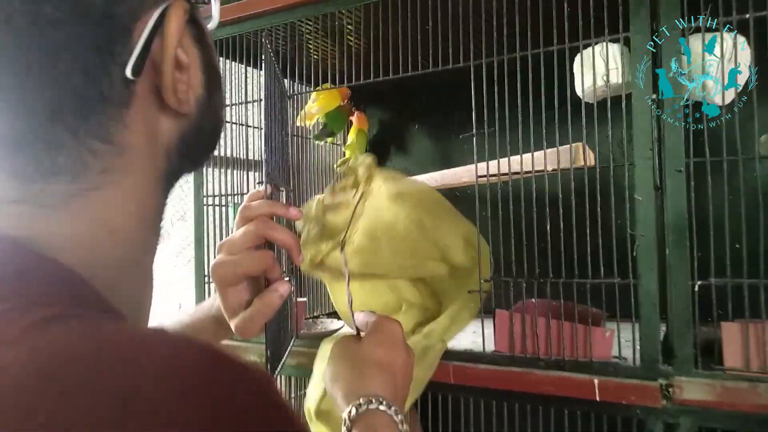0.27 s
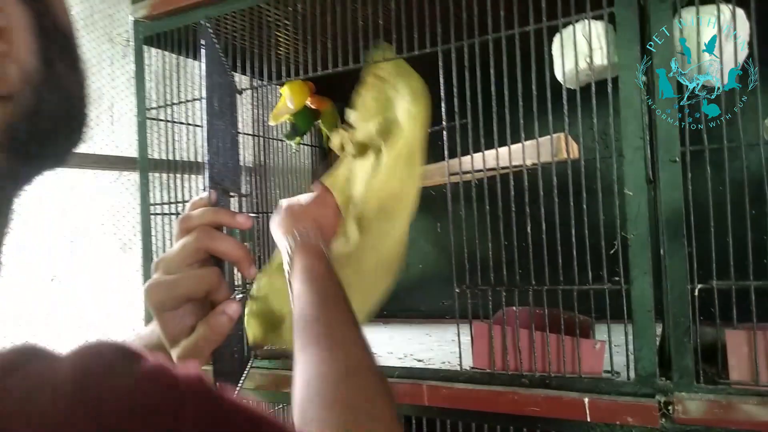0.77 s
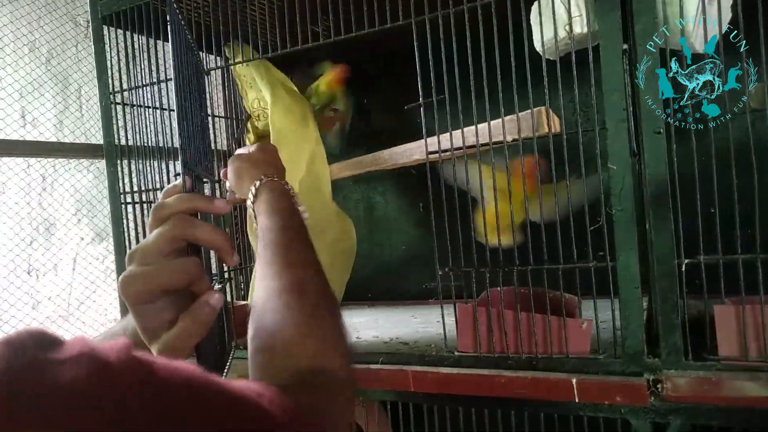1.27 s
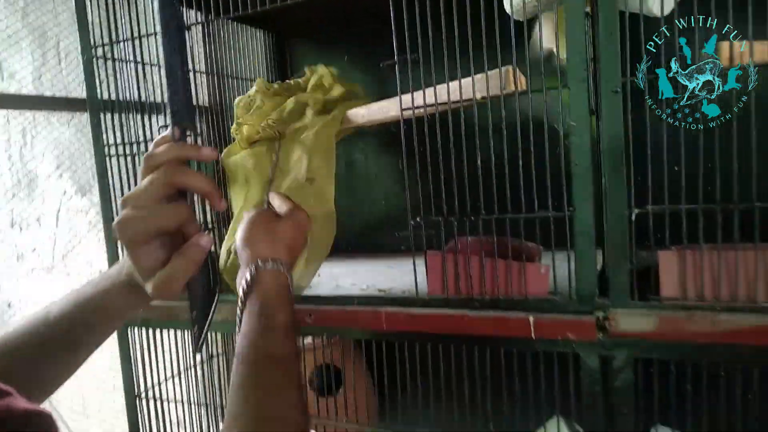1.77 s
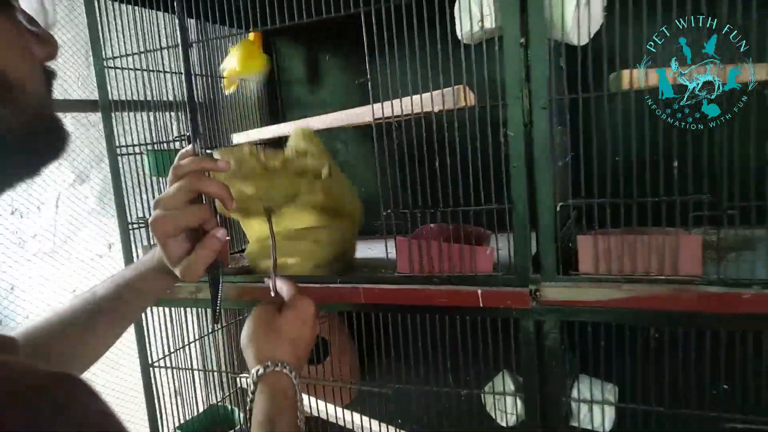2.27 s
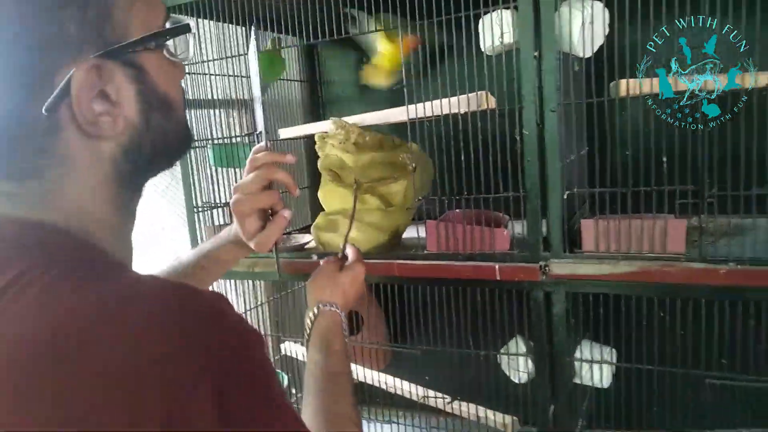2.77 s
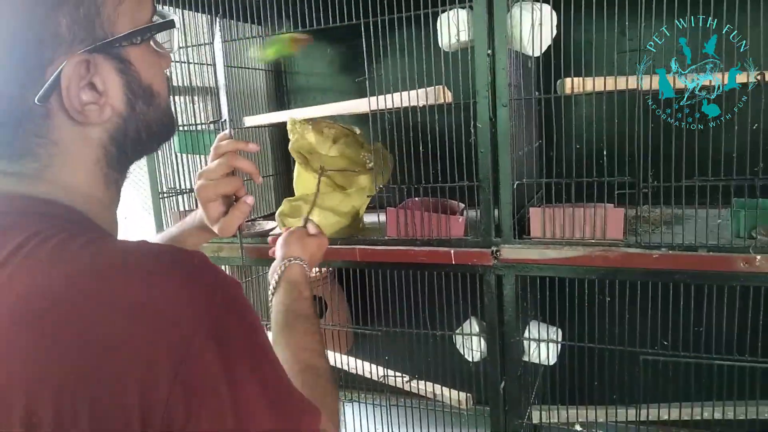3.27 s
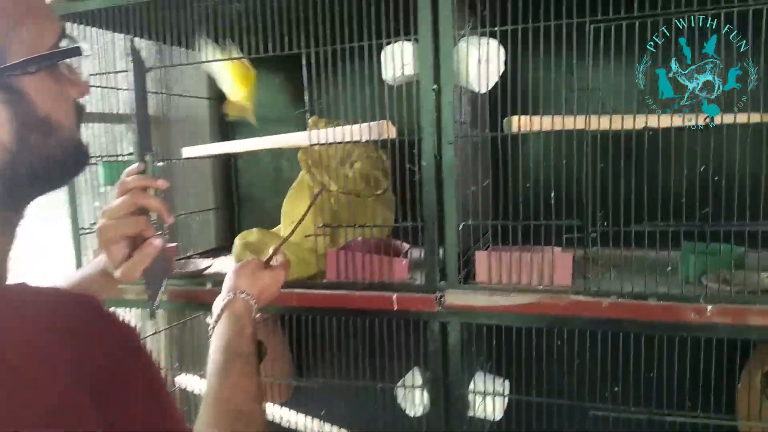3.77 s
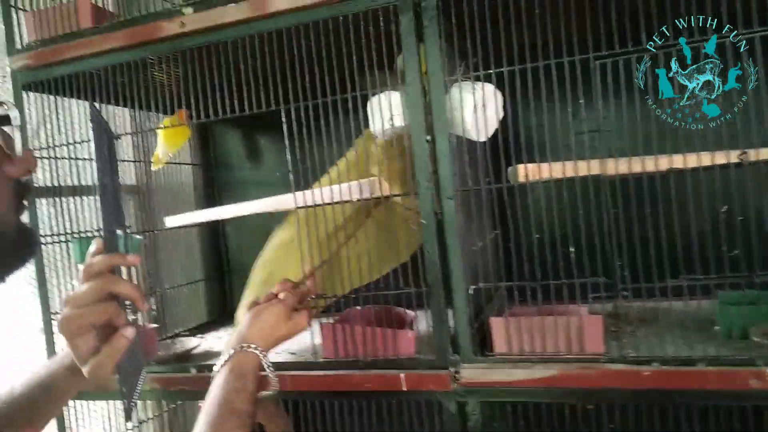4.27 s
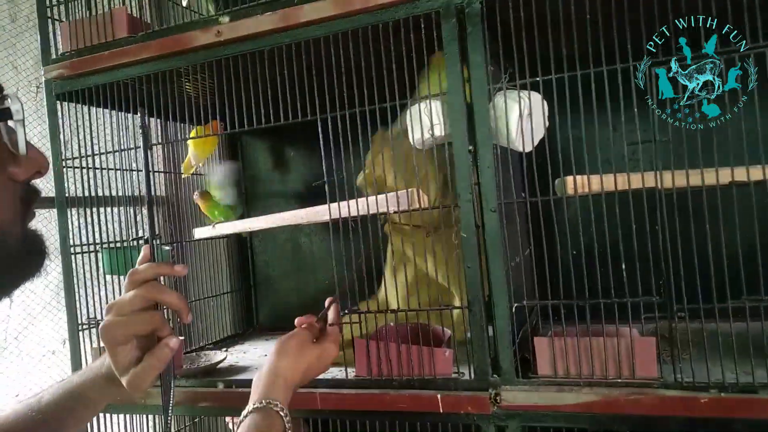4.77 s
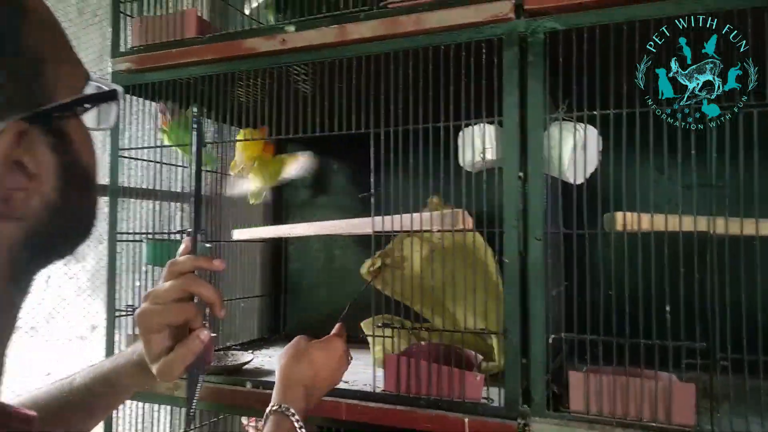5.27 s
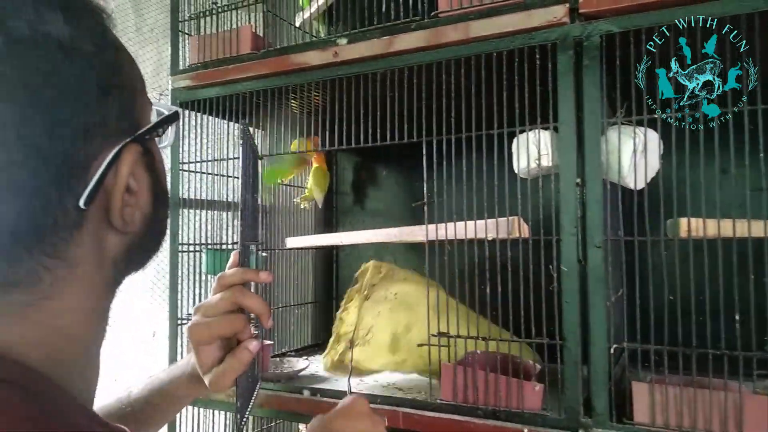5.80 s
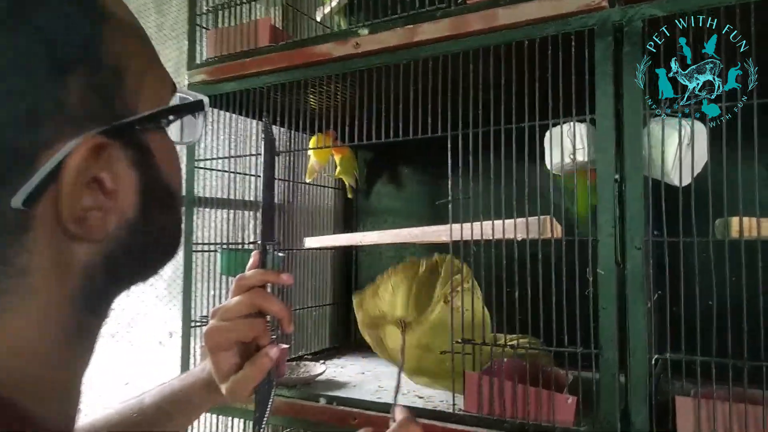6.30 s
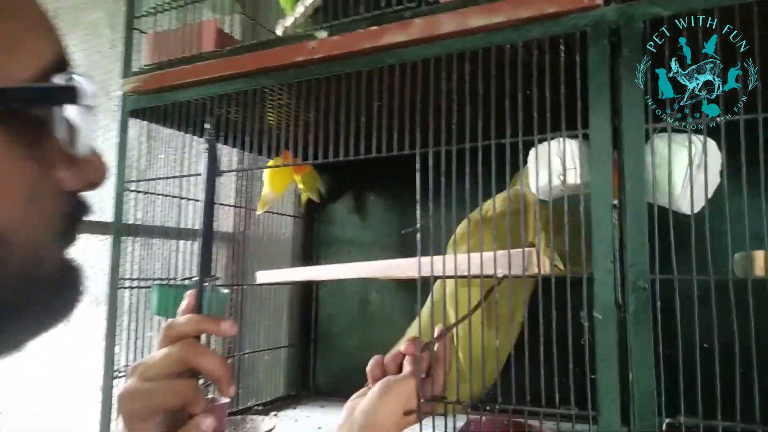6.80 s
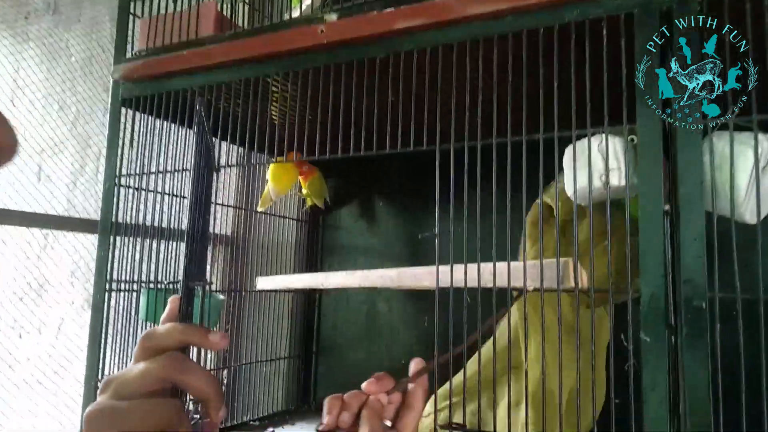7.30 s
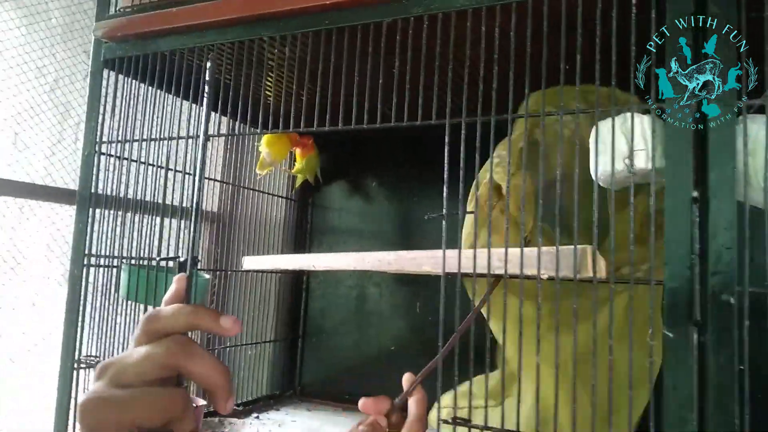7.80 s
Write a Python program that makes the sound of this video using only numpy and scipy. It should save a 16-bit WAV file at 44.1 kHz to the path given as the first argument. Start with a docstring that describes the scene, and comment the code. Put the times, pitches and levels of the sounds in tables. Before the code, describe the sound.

Fluttering wings thud and rustle in a hollow cage, short piercing chirps and faint wavering peeps between, cloth brushing and lightly pinging the wires.

```python
"""Lovebirds dodging a net

Lovebirds dodge a cloth net in a wire cage: noise pulsed by wing strokes makes air puffs, swish and rustle.
Sharp chirps are stacks of swept harmonics; another bird's thin whistles are wavering, nearly pure tones.
The net knocks the frame and pings the wires (decaying modes) and scrapes the tray (snaps through resonances).
The cage compartment booms under the wings, a small hard room answers calls and knocks, and a rumble lies below."""
import sys
import numpy as np
from scipy import signal
from scipy.fft import rfft, irfft, next_fast_len
from scipy.io import wavfile
from scipy.ndimage import uniform_filter1d, map_coordinates

SR = 44100
rng = np.random.default_rng(int(sys.argv[2]) if len(sys.argv) > 2 else 0)


def dump_mix(stems):
    """Bounce the given channels to the path in sys.argv[1] as a 16-bit WAV at rate SR."""
    frames = np.atleast_2d(stems).T  # one column per channel
    limited = np.clip(frames, -1, 1)  # hard clip at full scale
    pcm = np.round(limited * 32767).astype(np.int16)
    wavfile.write(sys.argv[1], SR, pcm)


N = 354872
ENVELOPE_STEP = 32  # samples between envelope points


def amp(db):
    """Decibels to gain."""
    return 10 ** (np.asarray(db) / 20)


def unit(x):
    """x at rms 1."""
    return x / np.sqrt(np.mean(x ** 2) + 1e-20)


def along(points, hz):
    """Read a curve of (frequency [Hz], value) points on a log frequency axis."""
    f, v = np.transpose(points)
    return np.interp(np.log(hz + 1), np.log(f + 1), v)


def wobble(rate, size=N):
    """A smooth random curve with rate knots a second."""
    knots = rng.standard_normal(int(size * rate / SR) + 4)
    return map_coordinates(knots, [np.arange(size) * rate / SR])


def filtered(x, response):
    """x times a response of frequency."""
    m = next_fast_len(N + SR // 2)
    return irfft(rfft(x, m) * response(np.fft.rfftfreq(m, 1 / SR)), m)[:N]


def coloured(x, spectrum):
    """x shaped by the given spectrum, at rms 1."""
    return unit(filtered(x, lambda hz: amp(along(spectrum, hz))))


def add(track, s, sound):
    """Mix a sound into the track at time s."""
    i = round(s * SR)
    track[i:i + len(sound)] += sound[:len(track) - i]


def shifting(x, ripple_db, patch_db):
    """Reflections stress narrow bands that change as the source moves; broader patches come and go."""
    z = signal.stft(x, nperseg=1024)[2]

    def blurred(bands, frames):
        grain = uniform_filter1d(rng.standard_normal(z.shape), size=bands, axis=0)
        return np.clip(unit(uniform_filter1d(grain, size=frames, axis=1)), -2, 2)

    ripple = blurred(bands=3, frames=14)
    patch = blurred(bands=16, frames=4)
    gain = amp(ripple_db * ripple + patch_db * patch)
    return signal.istft(z * gain, nperseg=1024)[1][:N]


def resonances(modes, hz):
    """Causal response of a body: band-pass modes summed with alternating sign."""
    return sum((-1) ** k * amp(db) * 1j * hz * width / (centre * centre - hz * hz + 1j * hz * width)
               for k, (centre, width, db) in enumerate(modes))


def crackle(rate, spread_db):
    """Tiny snaps at random moments; the spread makes a few much stronger than the rest."""
    sizes = amp(spread_db * np.minimum(rng.exponential(size=N), 4))
    return unit((rng.random(N) < rate / SR) * rng.choice([-1, 1], N) * sizes)


def swell(s, rise, hold, db, fall_db_per_s):
    """Power of a sound that builds up to time s, holds and dies away."""
    t = np.arange(0, N, ENVELOPE_STEP) / SR
    attack = np.clip(1 + (t - s) / rise, 0, 1)
    return (attack * amp(db - fall_db_per_s * np.maximum(t - s - hold, 0))) ** 2


def envelope(power):
    """Summed powers as one gain per sample."""
    return np.interp(np.arange(N), np.arange(0, N, ENVELOPE_STEP), np.sqrt(power))


# Tone of the quiet rumble: (frequency [Hz], level [dB])
RUMBLE_TONE = [(20, -37), (65, -31.5), (100, -11.5), (145, 1), (260, -5.5), (600, -19.5), (1500, -24),
               (2500, -25), (6000, -32.5), (10000, -36)]


def ambience():
    """The room's quiet rumble: noise with a fixed tone and gently shifting bands."""
    noise = shifting(rng.standard_normal(N), ripple_db=1.5, patch_db=1.0)
    return amp(-57.5) * coloured(noise, RUMBLE_TONE)


def wing_strokes(beat_hz, drift, sharpness, count=2):
    """Pressure of the downstrokes of a few birds, each wandering about the beat rate."""
    power = np.zeros(N)
    for _ in range(count):
        phase = np.cumsum(beat_hz * np.exp(drift * wobble(5))) / SR + rng.random()
        power += np.exp(sharpness * np.cos(2 * np.pi * phase))
    return unit(np.sqrt(power))


# Bursts of flapping, level before each layer's offset:
# (time at full effort [s], build-up [s], hold [s], relative level [dB])
FLIGHTS = [(0.085, 0.11, 0.21, -56.5), (0.853, 0.023, 0.28, -34), (1.049, 0.038, 0.11, -29),
           (1.218, 0.046, 0.3, -35.5), (1.59, .05, 0.07, -43.5), (2.085, 0.041, 0.015, -50),
           (2.286, 0.094, 0.09, -48.5), (2.7, 0.1, 0.11, -36.5), (2.89, 0.042, 0.13, -43),
           (3.477, 0.1, 0.071, -36), (3.57, 0.058, 0.044, -33), (3.737, 0.13, 0.29, -39),
           (4.422, 0.033, 0.046, -41), (4.904, 0.031, 0.028, -45.5), (5.219, 0.12, 0.1, -37.5),
           (5.299, 0.057, .12, -34), (5.955, 0.07, 0.23, -33.5), (6.259, 0.07, 0.072, -38),
           (7.78, 0.043, 0.29, -49)]
USUAL_DB = -41  # a usual burst


def flights(over_db, fall_db_per_s, grows=1):
    """Power the bursts put into one layer; grows sets how far it follows their effort about a usual burst."""
    return sum(swell(s, rise, hold, USUAL_DB + grows * (db - USUAL_DB) + over_db, fall_db_per_s)
               for s, rise, hold, db in FLIGHTS)


# Hollow of the compartment: (frequency [Hz], width [Hz], level [dB])
HOLLOW = [(149.6, 12.6, 3), (216.2, 14.6, -1.5), (255, 19.4, -5.5), (348.6, 14, -9), (427.6, 18, -5)]
# Tone of the pushed air: (frequency [Hz], level [dB])
PUFF_TONE = [(25, -33), (70, -24.5), (100, -8), (135, -1.5), (480, -3.5), (900, -4), (3000, -43.5)]
# Dull thumps in the compartment: (time at the peak [s], level [dB])
THUMPS = [(.085, -51), (.91, -28), (1.201, -28.5), (1.311, -28.5), (1.532, -28.5), (1.674, -31),
          (1.779, -38.5), (2.09, -49), (2.225, -42), (2.569, -42.5), (2.865, -33), (3.485, -35.5),
          (3.89, -34), (4.148, -48), (4.465, -45), (4.685, -42), (4.93, -34), (5.01, -40.5), (6.045, -40),
          (6.17, -32.5), (6.805, -41.5), (7.16, -48.5), (7.319, -46), (7.655, -46), (7.76, -40.5),
          (7.916, -49)]


def pushed_air(strokes):
    """Strokes push noisy air into the resonant hollow; dull thumps swell the same layer."""
    puffs = shifting(strokes * rng.standard_normal(N), ripple_db=2.0, patch_db=0)
    air = coloured(filtered(puffs, lambda hz: resonances(HOLLOW, hz)), PUFF_TONE)
    thumps = sum(swell(s, .03, 0, db, fall_db_per_s=329) for s, db in THUMPS)
    return air * envelope(flights(over_db=0.38, fall_db_per_s=79, grows=0.74) + thumps)


# The cloth net or a wing brushes the bars:
# (time at the peak [s], rise [s], rustle level [dB], swish level [dB])
BRUSHES = [(.18, 0.056, -55.5, -49), (.29, .03, -74, -46.5), (0.845, 0.018, -37.5, -29.5),
           (1.075, 0.023, -27, -30), (1.174, .025, -27, -45), (1.365, .025, -42, -53),
           (1.725, 0.015, -43.5, -40.5), (1.778, 0.036, -44.5, -41.5), (2.03, 0.033, -50, -56.5),
           (2.385, 0.032, -47, -43), (2.721, 0.026, -31.5, -48), (3.29, 0.013, -40, -40),
           (3.57, 0.033, -34.5, -40), (4.286, 0.022, -38.5, -41.5), (4.387, 0.039, -35.5, -41.5),
           (4.685, 0.046, -57, -62), (4.855, 0.024, -42.5, -45), (4.894, 0.019, -40, -42.5),
           (5.186, 0.019, -37, -41), (5.874, .03, -50.5, -53), (6.165, 0.035, -26, -46),
           (6.31, .04, -36.5, -37.5), (6.916, 0.097, -41.5, -45), (6.989, 0.15, -51.5, -46.5),
           (7.13, 0.02, -47, -60.5), (7.242, .11, -38.5, -48), (7.315, 0.09, -48.5, -45.5),
           (7.39, 0.02, -49, -55), (7.622, 0.042, -51.5, -58.5), (7.69, 0.062, -47.5, -60),
           (7.749, 0.023, -35.5, -47), (7.87, 0.022, -35.5, -50), (7.92, 0.011, -33, -54),
           (8.03, .04, -44, -56)]
# Tone of the swish: (frequency [Hz], level [dB])
SWISH_TONE = [(120, -25.5), (300, -27), (480, 4.5), (580, -12.5), (650, -1), (735, -5.5), (850, 0.5),
              (1150, -4.5), (1420, -6), (2100, -4.5), (2750, -0.5), (3600, -6), (5500, -17), (11000, -42.5)]


def wing_swish(strokes):
    """Wings and brushing cloth sweep the air: stroke-pulsed noise with even snaps."""
    sweep = strokes * (rng.standard_normal(N) + .5 * crackle(rate=460, spread_db=0))
    swish = coloured(shifting(sweep, ripple_db=4.5, patch_db=1.5), SWISH_TONE)
    brushes = sum(swell(s, rise, 0, db, fall_db_per_s=189.5) for s, rise, _, db in BRUSHES)
    return swish * envelope(flights(over_db=0.93, fall_db_per_s=96.5) + brushes)


# Tone of the rustle: (frequency [Hz], level [dB])
RUSTLE_TONE = [(500, -47.5), (1800, -0.5), (2800, -9), (4500, 1), (5800, 1.5), (7300, -2), (8900, -1),
               (10000, -8.5), (11000, -29.5)]


def feather_rustle(strokes):
    """Feathers and brushing cloth rustle: stroke-pulsed noise with snaps of uneven strength."""
    brush = strokes * (rng.standard_normal(N) + 0.55 * crackle(rate=500, spread_db=3.5))
    rustle = coloured(shifting(brush, ripple_db=4, patch_db=2), RUSTLE_TONE)
    brushes = sum(swell(s, rise, 0, db, fall_db_per_s=243) for s, rise, db, _ in BRUSHES)
    return rustle * envelope(flights(over_db=-7, fall_db_per_s=157) + brushes)


def flapping():
    """The same wing strokes pulse the air puffs, the swish and the rustle."""
    strokes = wing_strokes(beat_hz=17, drift=.15, sharpness=.65)
    return pushed_air(strokes) + wing_swish(strokes) + feather_rustle(strokes)


# The cage's floor tray: (frequency [Hz], width [Hz], level [dB])
TRAY = [(310, 22, 5.5), (369, 53, 4), (429.6, 16, 14.5), (497, 12, 7), (586, 9.2, 6.5), (620, 41, -0.5)]
# The net drags over the cage: (time [s], length [s], level [dB])
DRAGS = [(0.848, 0.24, -38), (4.07, .11, -47.5), (6.885, 0.22, -46.5), (7.268, 0.057, -54),
         (7.826, 0.15, -40), (7.95, 0.21, -40)]


def drags():
    """The net sticks and slips: uneven snaps shake the tray's resonances."""
    thin_bass = lambda hz: hz / (hz + 400)
    snaps = crackle(rate=350, spread_db=4.5)
    slips = unit(filtered(snaps, lambda hz: resonances(TRAY, hz) * thin_bass(hz)))
    pressure = np.zeros(N)
    for s, length, db in DRAGS:
        add(pressure, s, amp(db) * np.sqrt(np.abs(np.hanning(round(length * SR)))))
    return pressure * slips


# Reverb of the small hard room: (frequency [Hz], 60 dB decay time [s])
ROOM = [(150, 0.63), (1000, 0.14), (4000, 0.31), (10000, 0.18)]


def room(x, wet_db, near_db=-30, near_life=.012):
    """Direct sound, quick scatter off the cage walls and a tail longest in the bass, at unchanged energy."""
    hz, t, z = signal.stft(rng.standard_normal(SR // 2), SR, nperseg=256)
    decay = amp(-60 * t / along(ROOM, hz)[:, None])
    tail = signal.istft(z * decay, SR, nperseg=256)[1]
    near = rng.standard_normal(len(tail)) * np.exp(-np.arange(len(tail)) / SR / near_life)
    answer = amp(wet_db) * tail / np.linalg.norm(tail) + amp(near_db) * near / np.linalg.norm(near)
    answer[0] += 1  # direct sound
    heard = signal.fftconvolve(x, answer)
    return heard * np.linalg.norm(x) / np.linalg.norm(heard)


# What throat and beak let through: (frequency [Hz], level [dB])
BEAK = [(2500, -7.5), (3200, -5), (3700, 10.5), (4500, -1.5), (6300, 5.5), (7200, -2), (8600, -6.5),
        (9700, -13.5), (11500, -21)]
# Alarm chirps, level before beak and effort; the tilt adds to each harmonic over the one before:
# (time [s], length [s], top pitch [Hz], relative level [dB], harmonic tilt [dB])
CHIRPS = [(1.441, .036, 4290, -20, -1), (1.521, 0.019, 3225, -25.5, 1), (2.212, 0.031, 3936, -29, -1),
          (2.276, .032, 2997, -24.5, -2.5), (2.337, .024, 3000, -21, -4), (2.528, 0.044, 4806, -18.5, -2),
          (2.588, 0.039, 4120, -27.5, -1), (2.661, .03, 3553, -34, -3), (2.736, 0.0287, 3310, -33, 0),
          (3.882, 0.029, 4140, -24.5, -2.5), (3.953, 0.0263, 2767, -24.5, -2.5),
          (4.015, 0.032, 2570, -29, -0.5), (5.924, 0.031, 4707, -18, 3.5), (5.986, 0.043, 4280, -22.5, 0),
          (6.077, 0.036, 4265, -25, 5), (6.154, 0.025, 4367, -13, -3.5)]


def chirps(arch=0.1506, crest=.46, rasp=.036, flutter_db=2.0, count=3):
    """Each chirp snaps on, sweeps up and falls back with a fast rasp; the beak weights its harmonics."""
    out = np.zeros(N)
    for s, length, top_hz, db, tilt_db in CHIRPS:
        u = np.linspace(0, 1, round(length * SR))  # progress through the chirp
        shake = wobble(1287, size=SR // 10)[:len(u)]
        tremor = wobble(545, size=SR // 10)[:len(u)]
        pitch = top_hz * (1 - arch * ((u - crest) / crest) ** 2 + rasp * shake)
        phase = 2 * np.pi * np.cumsum(pitch) / SR
        voice = np.zeros(len(u))
        for k in range(1, count + 1):
            harmonic_db = db + along(BEAK, k * top_hz) + tilt_db * (k - 1)
            voice += amp(harmonic_db) * np.sin(k * phase)
        effort = np.abs(np.sin(np.pi * u)) * amp(4 + flutter_db * tremor)
        add(out, s, room(voice * effort, wet_db=-1, near_db=0, near_life=.022))
    return out


# Whistled notes; scoop is how far below pitch a note starts, level is before swell and waver:
# (time [s], length [s], pitch [Hz], scoop [share of pitch], relative level [dB])
PEEPS = [(1.917, 0.086, 2400, 0, -44.5), (2.045, 0.077, 2416, 0, -39.5), (2.219, 0.14, 2486, 0.07, -36),
         (2.376, 0.04, 2567, 0, -31), (2.532, 0.084, 2575, 0.11, -35), (2.681, 0.024, 2593, 0.04, -25.5),
         (2.88, 0.085, 2500, 0.08, -40.5), (3.208, 0.054, 2640, .11, -40),
         (3.262, 0.071, 2512, 0.01, -42.5), (3.346, 0.055, 2663, 0.04, -33),
         (4.605, 0.093, 2708, 0.01, -34), (4.862, .1, 3082, .05, -37.5), (5.111, 0.11, 3400, .12, -41),
         (5.404, 0.1, 3380, 0.04, -33.5), (5.646, .16, 3110, 0.15, -49), (5.848, .081, 2780, 0.05, -50.5),
         (7.115, .215, 2342, .08, -43), (7.422, 0.087, 2377, 0.04, -44), (7.565, .089, 2414, 0, -43),
         (7.748, 0.139, 2411, 0, -34.5), (7.917, 0.035, 2485, .01, -38)]
SCOOP_S = .03  # time constant of the scoop up to pitch
# High notes sag by this share and low ones creep up; pitch that stays level; distance to full sag
SAG, LEVEL_HZ, SAG_SPAN_HZ = 0.022, 2580, 151


def peeps(fade=0.0085, quaver=.012, waver_db=3.5, swell_db=6):
    """Thin, wavering whistles from a bird farther off; notes scoop up, swell and are smeared by the room."""
    out = np.zeros(N)
    for s, length, hz, scoop, db in PEEPS:
        u = np.linspace(0, 1, round(length * SR))  # progress through the note
        shake = wobble(260, size=SR // 2)[:len(u)]
        tremor = wobble(60, size=SR // 2)[:len(u)]
        strain = (hz / 2700) ** 4  # higher notes are less steady
        sag = SAG * np.clip((hz - LEVEL_HZ) / SAG_SPAN_HZ, -1, 1)
        tune = 1 - scoop * np.exp(-u * length / SCOOP_S) - sag * (u - .5)
        pitch = hz * tune * (1 + quaver * strain * shake)
        gate = np.clip(np.minimum(u, 1 - u) * length / fade, 0, 1)
        level_db = db + 4.5 - swell_db * (1 - u) ** 2 + waver_db * tremor
        phase = 2 * np.pi * np.cumsum(pitch) / SR
        tone = np.sin(phase) + amp(-29) * np.sin(2 * phase)
        add(out, s, room(gate * amp(level_db) * tone, wet_db=-3, near_db=-9.5))
    return out


def ring(modes, attack):
    """One blow on a set of decaying modes, each at a fresh strength, with a brief noisy scuff."""
    t = np.arange(SR // 3) / SR
    sound = np.zeros(len(t))
    for hz, db, t60 in modes:
        decay = amp(db + rng.normal(0, 2) - 60 * t / t60)
        sound += decay * np.sin(2 * np.pi * (hz * t + rng.random()))
    scuff = 0.48 * np.exp(-t / 0.0039) * rng.standard_normal(len(t))
    return (sound + scuff) * (1 - np.exp(-t / attack)) / np.sqrt(len(modes))


# Ring of the cage frame: (frequency [Hz], relative level [dB], 60 dB decay time [s])
FRAME = [(507, 3.5, .07), (665, 0, .07), (814, 4, 0.13), (970, -4, .06), (1167, 8, 0.062),
         (1318, -2.5, 0.16), (1565, -3, .06), (1883, -2, 0.092), (2530, -13, .05)]
# Ring of the cage wires: (frequency [Hz], relative level [dB], 60 dB decay time [s])
WIRES = [(2960, -5, 0.1), (3806, 2, 0.12), (4420, 7.5, 0.06), (5350, -14, 0.12), (7450, -10, 0.072)]
# Knocks on the cage, levels before the trims below:
# (time [s], relative frame knock level [dB], relative wire ping level [dB])
BUMPS = [(4.523, -43, -60), (4.678, -72.5, -50), (6.842, -63, -51), (7.449, -67.5, -39),
         (7.862, -51.5, -31), (7.916, -58, -50), (7.974, -54, -35)]


def bumps():
    """The net's hoop or a bird knocks the frame and sets the wires ringing."""
    out = np.zeros(N)
    for s, knock_db, ping_db in BUMPS:
        knock = amp(knock_db + 14.5) * ring(FRAME, attack=0.001)
        ping = amp(ping_db - 1) * ring(WIRES, attack=0.0015)
        add(out, s, room(knock + ping, wet_db=-4.5))
    return out


def scene():
    """The cage over the room's quiet rumble."""
    return (ambience() + flapping() + drags() + chirps() + peeps() + bumps())[None]


def record(dry, top_hz=10700):
    """The phone thins the deep bass and cuts very steeply above its band limit."""
    bass_cut = [(50, -4.5), (90, -1), (135, 0.5)]  # (frequency [Hz], level [dB])
    thinned = filtered(dry[0], lambda hz: amp(along(bass_cut, hz)))
    return filtered(thinned, lambda hz: 1 / np.sqrt(1 + (hz / top_hz) ** 200))[None]


dry = scene()
out = record(dry)
dump_mix(out)
```